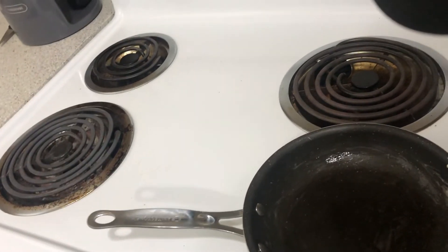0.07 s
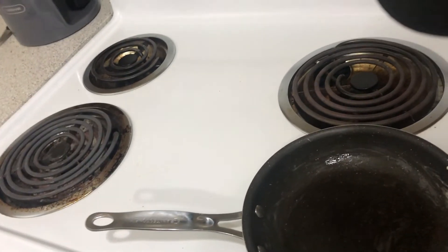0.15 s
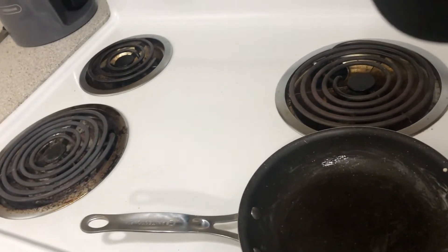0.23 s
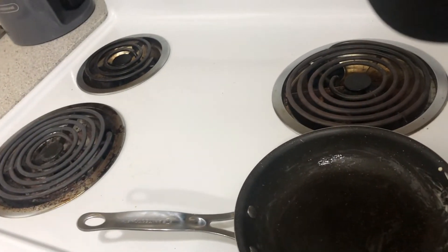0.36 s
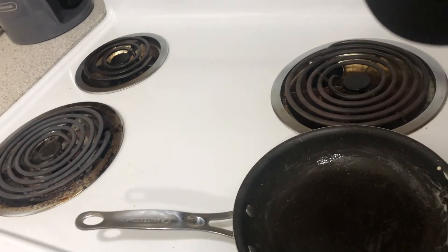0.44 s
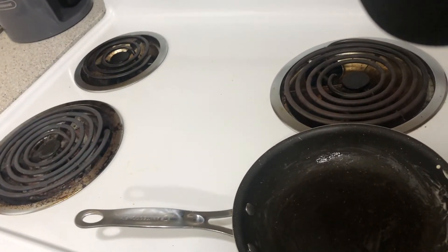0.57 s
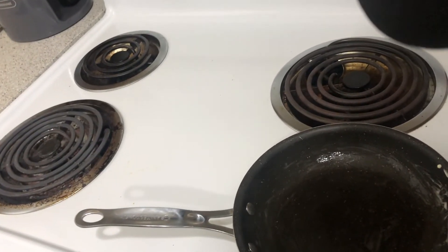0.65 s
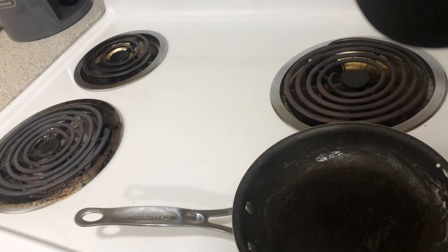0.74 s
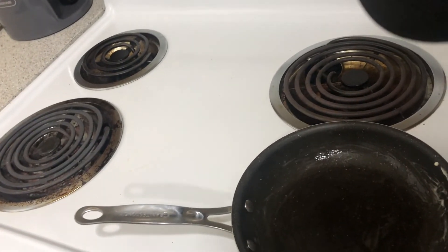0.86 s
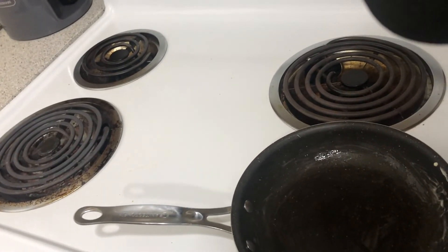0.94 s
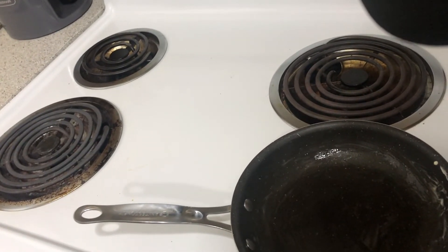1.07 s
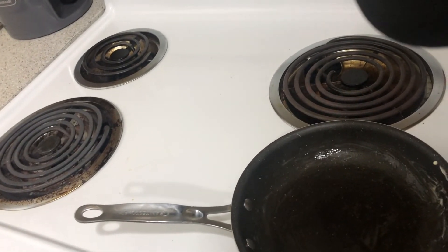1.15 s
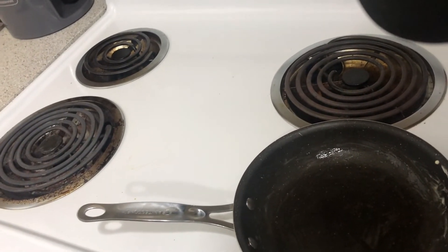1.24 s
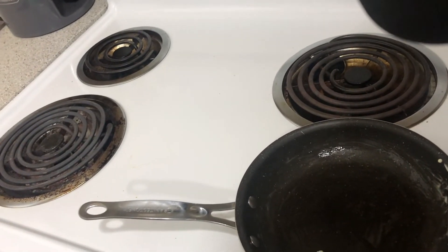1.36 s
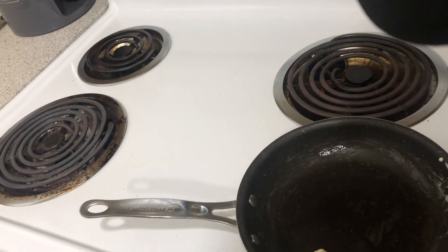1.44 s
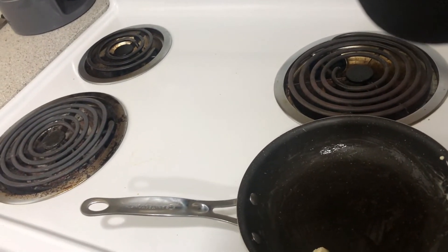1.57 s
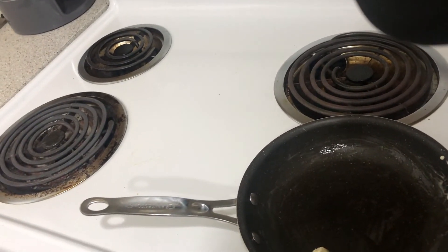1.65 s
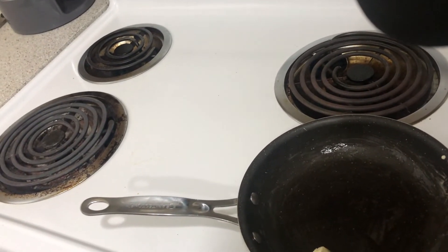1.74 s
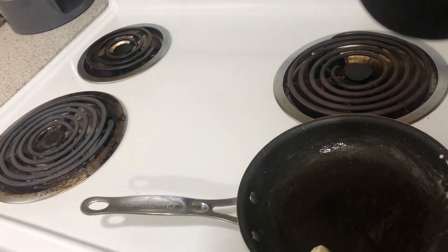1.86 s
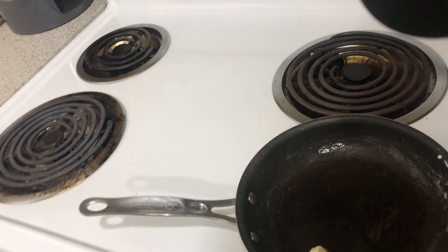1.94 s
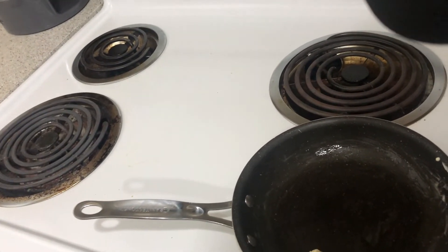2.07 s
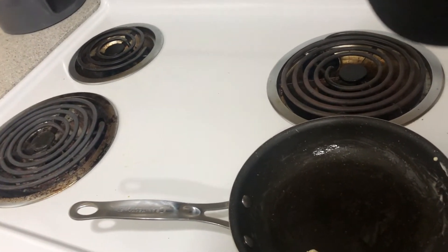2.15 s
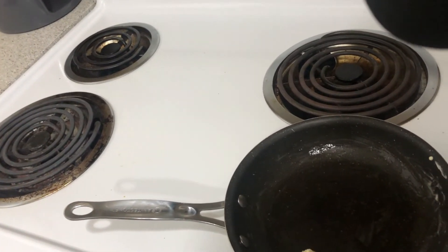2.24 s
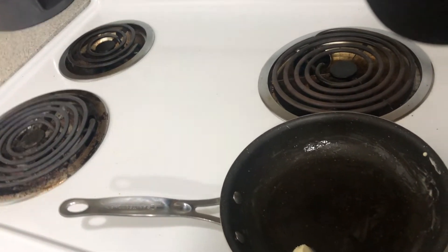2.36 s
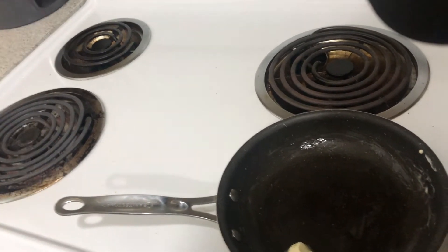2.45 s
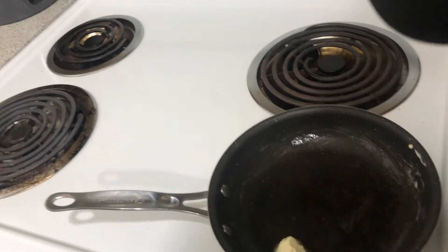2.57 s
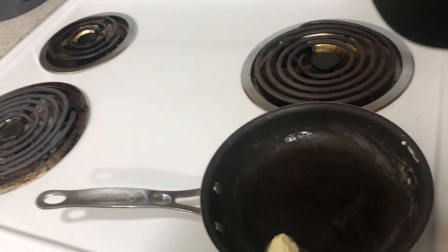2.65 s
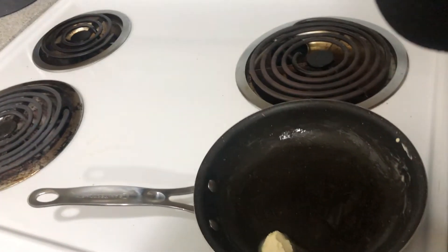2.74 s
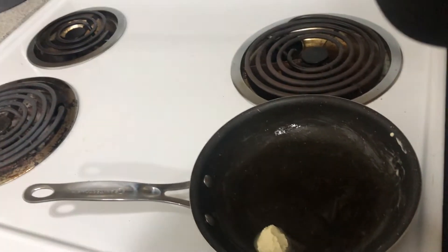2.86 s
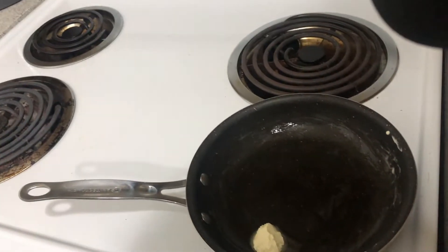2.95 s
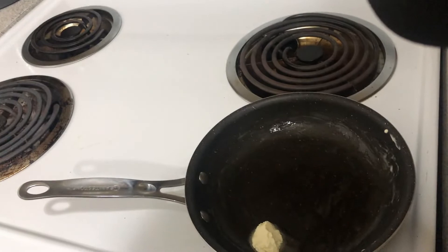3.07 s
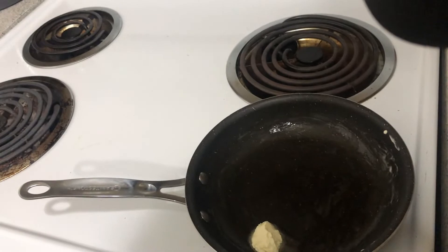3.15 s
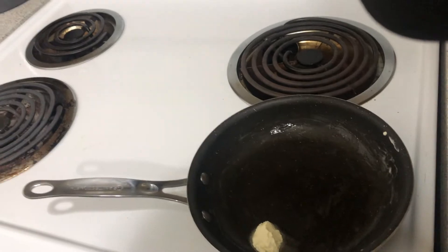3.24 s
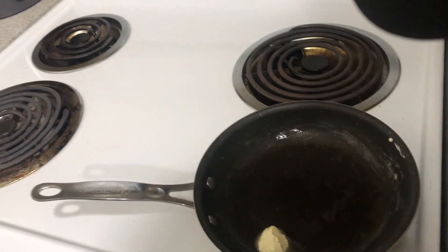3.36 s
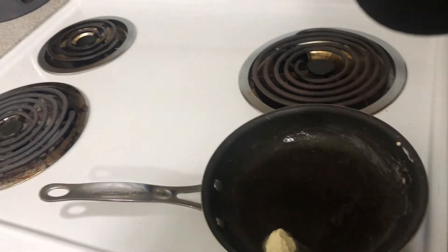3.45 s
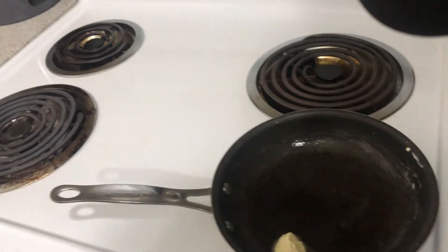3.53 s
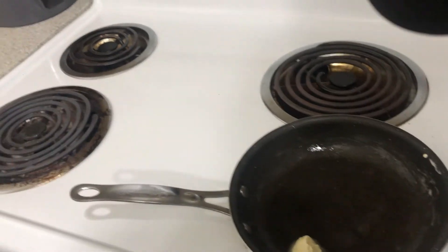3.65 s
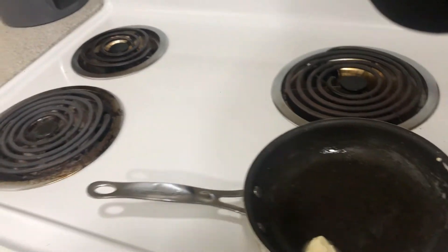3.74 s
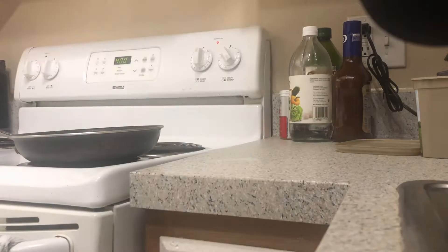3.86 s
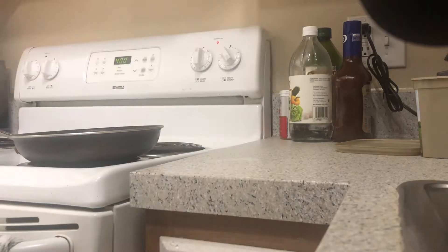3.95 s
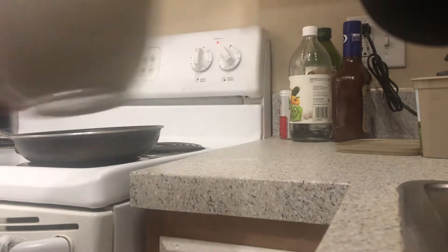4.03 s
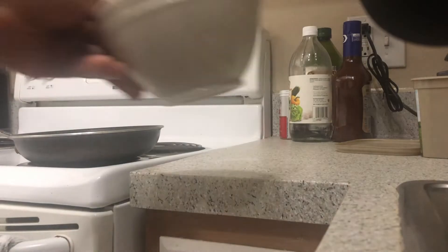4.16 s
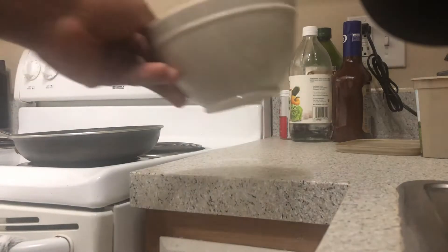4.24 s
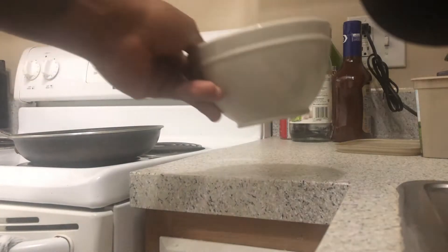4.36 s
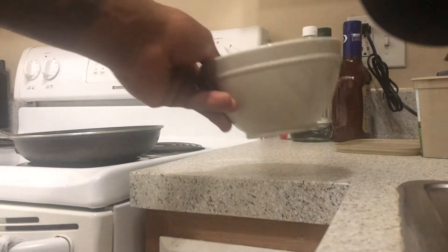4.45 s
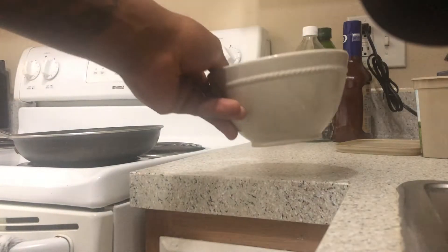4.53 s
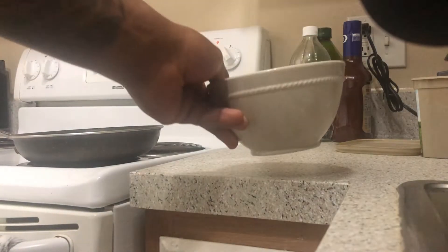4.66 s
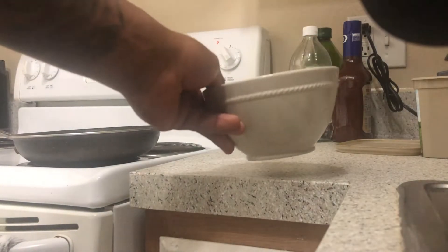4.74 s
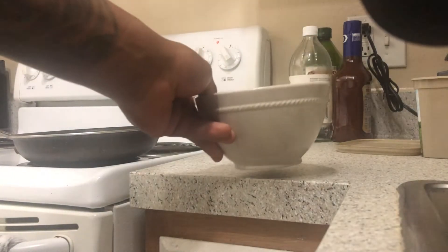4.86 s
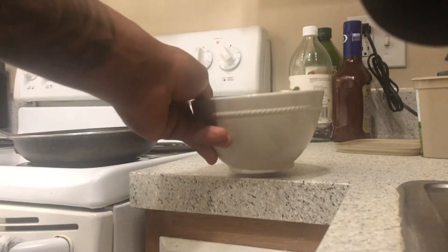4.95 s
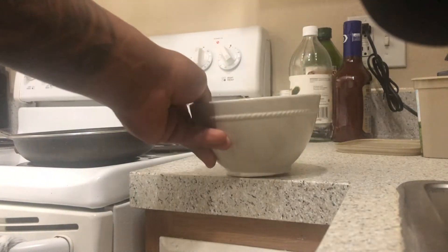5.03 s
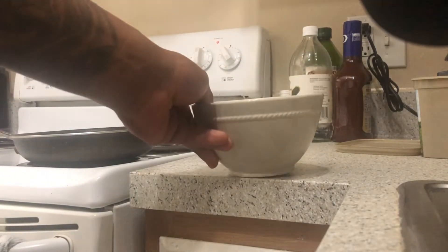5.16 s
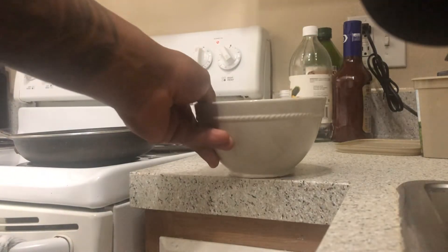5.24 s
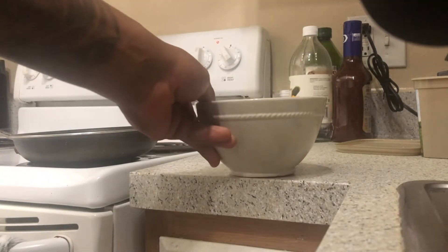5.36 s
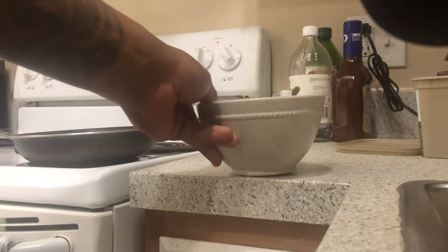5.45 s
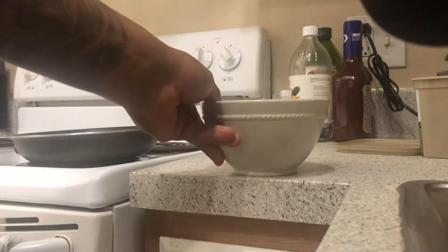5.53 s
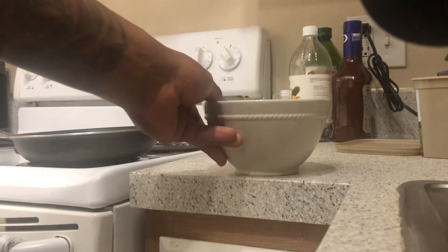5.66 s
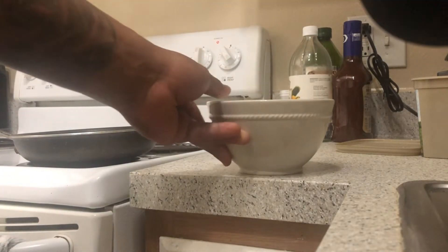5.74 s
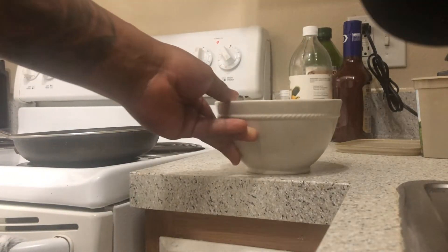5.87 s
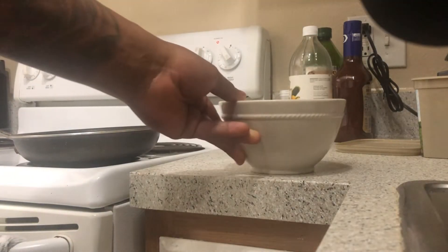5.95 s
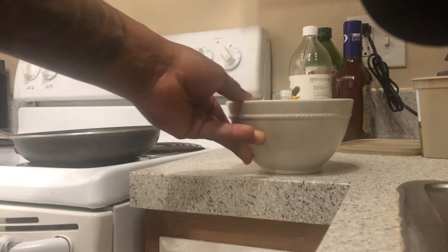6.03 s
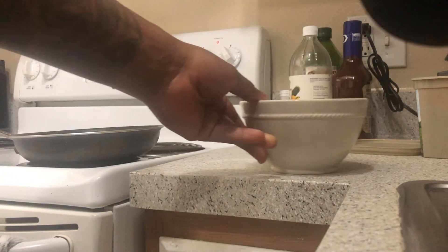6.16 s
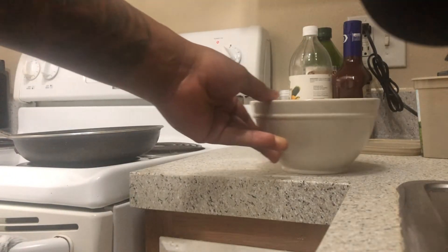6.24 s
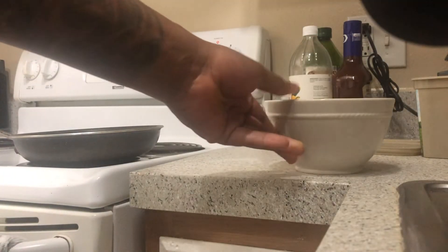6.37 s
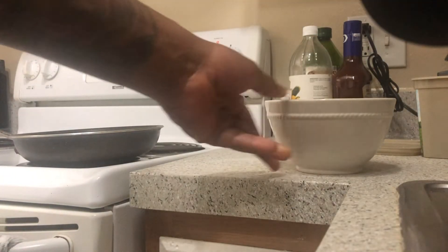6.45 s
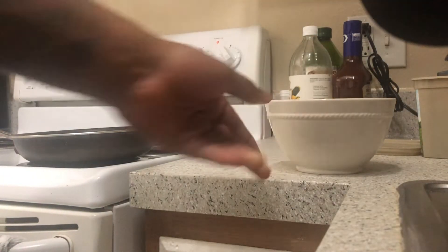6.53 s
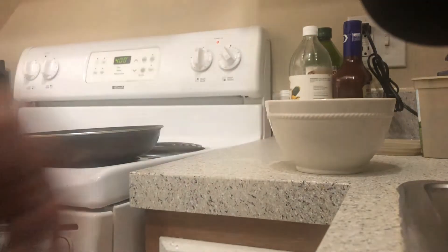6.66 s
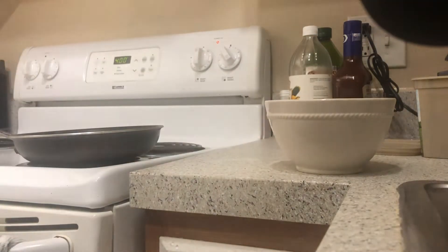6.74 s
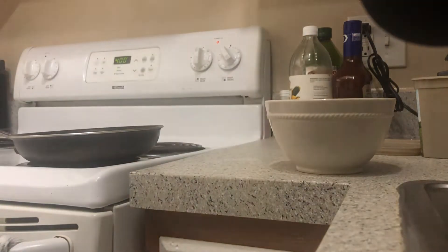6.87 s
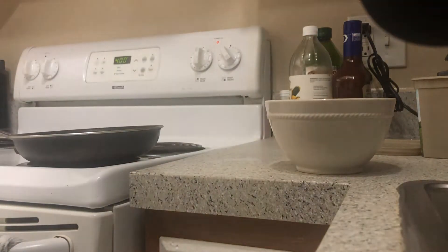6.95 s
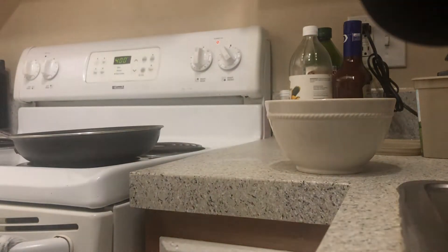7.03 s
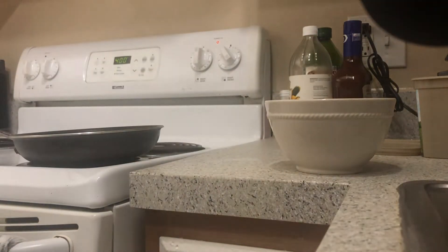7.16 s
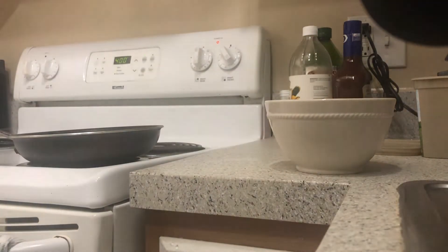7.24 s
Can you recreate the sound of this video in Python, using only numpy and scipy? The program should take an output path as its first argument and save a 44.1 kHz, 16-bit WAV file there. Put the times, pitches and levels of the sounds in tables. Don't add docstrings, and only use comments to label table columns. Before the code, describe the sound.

A quiet kitchen with low rumble and faint hiss, heard close on a phone microphone with short room reverberation. A very soft bump at 0.1 s, then near silence until a faint scrape at 1.8. A metal spoon raps a frying pan at 1.9, 2.2, 2.45, 2.7 and 2.9 s: bright ticks, a quick rebound, a short damped pan ring and a low stove-top thump, the third loudest. At 3.3 the spoon is laid down, clinking and knocking on enamel in weakening rocks until 3.55. Soft sleeve brush, palm rub and dull bumps run from 3.7 to 4.3. After a pause, a ceramic bowl touches the counter edge first at 5.1, then lands flat with a hollow clacking thud at 5.5. Gritty pushes grow into a longer scrape around 6.0-6.4, leaving a faint ring. Soft pats at 6.8-7.3.

```python
import sys
import numpy as np
from scipy import signal
from scipy.fft import rfft, irfft
from scipy.io import wavfile

SR = 44100
rng = np.random.default_rng(int(sys.argv[2]) if len(sys.argv) > 2 else 0)


def boost_factor(decibels):
    exponent = np.asarray(decibels, float) / 20
    return 10 ** exponent


def transcribe(u):
    v = np.clip(np.atleast_2d(u).T, -1, 1)
    q = np.round(v * 32767).astype(np.int16)
    wavfile.write(sys.argv[1], SR, q)


N = 321930

# (frequency [Hz], level [dB], t60 [s])
STOVE_MODES = [(84, -9, 0.14), (120.6, -3.5, 0.093), (167, -22, 0.22), (243.2, -10, 0.095),
               (339.4, -12, 0.046), (458.6, -25, 0.13), (590, -28, 0.05)]
VIEWS = [
    [1.9],
    [2.3],
    [2.7],
    [.7],
    [1.3],
    [.4],
    [2.9],
]


def at_hz(points, hz):
    table_hz, value = np.array(points).T
    return np.interp(np.log(hz), np.log(table_hz), value)


def rms_one(x):
    return x / np.sqrt(np.mean(x ** 2) + 1e-20)


def coloured(x, db_at):
    hz = np.maximum(np.fft.rfftfreq(len(x), 1 / SR), 10)
    return rms_one(irfft(rfft(x) * boost_factor(db_at(hz)), len(x)))


def grains(per_s, spread_db, size=N):
    height_db = spread_db * np.minimum(rng.exponential(1, size), 5)
    height = boost_factor(height_db) * rng.choice([-1, 1], size)
    return rms_one(height * (rng.random(size) < per_s / SR))


def ring(x, hz, t60):
    r = boost_factor(-60 / (t60 * SR))
    w = 2 * np.pi * hz / SR
    return signal.lfilter([0, np.sin(w)], [1, -2 * r * np.cos(w), r * r], x + 1e-18)


def crowd(spectrum, low_hz, t60, damping, count):
    hz = np.geomspace(low_hz, 15500, count) * rng.uniform(.97, 1.03, count)
    level_db = at_hz(spectrum, hz) + 10 * np.log10(hz / 1000)
    return np.transpose([hz, level_db, t60 * (hz / 1000) ** -damping])


def add(out, s, level_db, modes, swell_cycles):
    onset_delay_s, vary_db = .0008, 1.5
    scatter_rad = .7
    hz, mode_db, t60 = np.array(modes, float).T[:, :, None]
    t = np.arange(int(1.2 * np.clip(t60.max(), .01, .5) * SR)) / SR
    swell = (1 - np.exp(-t * hz / max(swell_cycles, .01))) ** 2
    mode_db = mode_db + vary_db * rng.standard_normal(hz.shape)
    strength = swell * boost_factor(level_db + mode_db - 60 * t / t60)
    phase = np.multiply(VIEWS, np.arange(len(hz)) ** 2) + scatter_rad * rng.standard_normal(len(hz))
    turn = 2 * np.pi * hz * t
    sound = np.cos(phase) @ (strength * np.sin(turn)) + np.sin(phase) @ (strength * np.cos(turn))
    i = round((s + onset_delay_s) * SR)
    out[:, i:i + len(t)] += sound[:, :N - i]


def stroke_db(start, swell, steady, top_db, fade_db_per_s):
    t = np.arange(N) / SR - start
    rise_db = -17 * np.clip(1 - t / max(swell, .002), 0, 1)
    fade_db = fade_db_per_s * np.maximum(t - swell - steady, 0)
    return np.where(t < 0, -200, top_db + rise_db - fade_db)


def hush():
    # (frequency [Hz], level [dB per Hz])
    hush_spectrum = [(16, -41.5), (49, -1.5), (330, -8.5), (1200, -22.5), (2670, -28), (9740, -30.5),
                     (14300, -37), (16000, -53.5)]
    return boost_factor(-65.5) * coloured(rng.standard_normal(N), lambda hz: at_hz(hush_spectrum, hz))


def kitchen(toward_walls):
    # (frequency [Hz], t60 [s])
    room_t60 = [(100, 0.69), (400, 0.52), (1200, 0.39), (3000, 0.42), (7000, 0.26), (14000, 0.23)]
    t = np.arange(SR // 2) / SR
    white = rng.standard_normal((2, len(toward_walls), len(t)))
    tail = 0
    edges_hz = 50 * 2 ** np.arange(0, 8.6, .5)
    for k, (low, high) in enumerate(zip(edges_hz, edges_hz[1:])):
        sos = signal.butter(2, [low, high], "band", fs=SR, output="sos")
        band = signal.sosfilt(sos, white[k % 2])
        tail = tail + band * boost_factor(-60 * t / at_hz(room_t60, np.sqrt(low * high)))
    tail = tail * (1 - np.exp(-t / 0.0026))
    return signal.fftconvolve(toward_walls, tail, axes=1)[:, :N].sum(axis=0) / np.sqrt(SR / 13)


def rubs():
    # (start [s], swell [s], steady [s], level [dB], centre [Hz])
    spoon_scrapes = [
        (1.769, 0.038, .115, -65.5, 2620),
        (3.459, 0.011, 0.078, -65, 2500),
    ]
    sleeve_brushes = [
        (3.68, 0.035, 0.075, -58, 7900),
        (6.77, 0.028, 0.079, -71, 7700),
    ]
    palm_rubs = [
        (3.889, 0.083, 0.042, -59, 3550),
        (4.09, 0.017, 0.051, -73.5, 3550),
    ]
    hand_pats = [
        (4.247, 0.0058, .002, -50.5, 1360),
        (6.901, 0.01, .02, -63, 3000),
        (7.23, 0.033, .05, -58, 4800),
    ]
    # (below [octaves], above [octaves], resonance [Hz], resonance [dB])
    rub_colour = [
        (10, 1, 2300, 3.5),
        (1.24, 0.53, 7400, 0.2),
        (4.2, .86, 1630, 9),
        (5, 1, 6200, 4.5),
    ]
    out = np.zeros(N)
    gestures = spoon_scrapes, sleeve_brushes, palm_rubs, hand_pats
    for rows, (below, above, peak_hz, peak_db) in zip(gestures, rub_colour):
        for s, swell, steady, level_db, centre_hz in rows:
            def hump_db(hz):
                width = np.where(hz < centre_hz, below, above)
                resonance = np.exp(-(np.log2(hz / peak_hz) / 0.22) ** 2)
                return -4.3 * (np.log2(hz / centre_hz) / width) ** 2 + peak_db * resonance

            friction = grains(per_s=9100, spread_db=1.5, size=SR // 2)
            span = slice(int(s * SR), int(s * SR) + SR // 2)
            gain = boost_factor(stroke_db(s, swell, steady, level_db, fade_db_per_s=268)[span])
            out[span] += gain * coloured(friction, hump_db)[:len(gain)]
    return out


def bumps():
    # (time [s], level [dB], frequency [Hz], t60 [s])
    soft_blows = [(0.127, -49.5, 148, 0.057), (3.891, -45.5, 157, 0.033), (4.103, -33, 239, 0.034),
                  (4.103, -56, 1930, .015), (4.117, -52, 300, 0.098), (4.254, -45.5, 300, 0.023),
                  (4.275, -44, 246, 0.034), (5.332, -44, 183, 0.073), (6.757, -60, 2300, 0.012),
                  (6.756, -57, 5300, 0.01), (6.905, -41.5, 243, 0.044), (6.909, -45, 91, 0.093),
                  (6.914, -37, 451, 0.014), (6.927, -44.5, 300, .04), (6.94, -45, 242, 0.036)]
    out = np.zeros((len(VIEWS), N))
    for s, peak_db, hz, t60 in soft_blows:
        modes = [(hz * ratio, -2 - 14 * np.log2(ratio), t60 * ratio ** -.3) for ratio in (1, 1.6, 2.3, 2.8)]
        add(out, s, peak_db, modes, swell_cycles=0.2)
    return out


def weak_pan_modes():
    # (frequency [Hz], level [dB])
    pan_envelope = [(300, -4.5), (700, -19), (1000, -9), (1350, -1.5), (2100, -11.5), (3000, -13.5),
                    (7000, -17.5), (15500, -55.5)]
    return crowd(pan_envelope, low_hz=347.1, t60=0.029, damping=0.12, count=150)


def rattle(weak):
    # (time [s], clink [dB], knock delay [s], knock [dB])
    rocks = [
        (3.265, -32.5, .003, -38.5),
        (3.372, -41, .0105, -46.5),
        (3.4218, -37, .013, -47),
        (3.471, -48.5, 0.01, -53),
        (3.53, -52, .014, -59),
    ]
    # (frequency [Hz], level [dB], t60 [s])
    spoon_modes = [(2780, -6, 0.009), (4910, -8, 0.032), (7000, 0.5, 0.0081), (8700, -5, .008),
                   (10550, -7, 0.011), (11300, -10, 0.0096), (13100, -11, 0.0073), (14400, -23, 0.0055)]
    # (frequency [Hz], level [dB], t60 [s])
    enamel_modes = [(232, -7.5, 0.16), (280, 7.5, 0.038), (419, -9.5, 0.057), (635, 0, 0.034),
                    (796, -13, 0.032), (1060, 6.5, 0.032), (1120, -14, 0.026), (1355, -2, 0.039),
                    (1463, -1, 0.036), (1950, -24.5, 0.042)]
    chatter_s, chatter_db = .009, -8
    handle_clink_db, stove_shake_db = -3.5, -5
    handle_tilt_db = 12
    soft_tilt_db = .55
    clink_hz = 4640
    out = np.zeros((len(VIEWS), N))
    high = weak[:, 0] > 2000
    steel = np.vstack([spoon_modes, weak[high] - [0, 5.5, 0]])
    enamel = np.vstack([enamel_modes, weak[~high] - [0, 8, 0]])
    for s, clink_db, lag, knock_db in rocks:
        handle = s + lag + np.cumsum([0, *chatter_s * rng.uniform(.6, 1.8, size=2)])
        for k, at in enumerate([s, *handle]):
            db = clink_db + (k > 0) * handle_clink_db + max(k - 1, 0) * chatter_db
            tilt_db = (k > 0) * handle_tilt_db + soft_tilt_db * (rocks[0][1] - db)
            touch = steel.copy()
            touch[:, 1] -= tilt_db * np.maximum(np.log2(touch[:, 0] / clink_hz), 0)
            add(out, at, db - 6, touch, swell_cycles=0.97)
        for k, at in enumerate(handle):
            add(out, at, knock_db - 1.0 + k * chatter_db, enamel, swell_cycles=0.84)
        add(out, s + lag, knock_db + stove_shake_db, STOVE_MODES, swell_cycles=0.38)
    return out


def spoon(weak):
    # (time [s], peak [dB], tick [dB], rebound re peak [dB], stove thump [dB])
    raps = [
        (1.913, -17.5, -15.5, -5, -23.5),
        (2.233, -22.5, -16.5, -3.5, -22),
        (2.447, -15, -11, -4, -19.5),
        (2.679, -17.5, -10, 0, -21),
        (2.896, -17.5, -17, -0.5, -21.5),
    ]
    # (frequency [Hz], level [dB], t60 [s])
    tick_modes = [(4570, -2.5, 0.003), (6010, -4, 0.0023), (7760, 1, 0.0015), (10180, -9.5, 0.0014),
                  (13420, -43.5, 0.003)]
    # (frequency [Hz], level [dB], t60 [s])
    pan_modes = [(330, -21, 0.0083), (1057, 5, 0.037), (1250, 11, 0.038), (1326, 8, 0.039),
                 (1740, -23, .025), (2032, 6, .03), (2270, -2, 0.012), (2640, -42, 0.012),
                 (3900, -6, 0.0067), (4700, -30, 0.018), (5600, -27, 0.019)]
    longest_ring_s, rebound_s, thump_s = .018, 0.0049, 0.00402
    out = np.zeros((len(VIEWS), N))
    strong = [(hz, db, min(t60, longest_ring_s)) for hz, db, t60 in pan_modes]
    for s, peak_db, tick_db, rebound_db, thump_db in raps:
        add(out, s, tick_db, tick_modes, swell_cycles=0.66)
        first = s, peak_db, 16000
        rebound = s + rebound_s, peak_db + rebound_db, 4500
        for at, blow_db, top_hz in (first, rebound):
            add(out, at, blow_db - 14.0, strong, swell_cycles=1.0)
            add(out, at, blow_db - 17.0, weak[weak[:, 0] < top_hz], swell_cycles=0.85)
        add(out, s + thump_s, thump_db, STOVE_MODES, swell_cycles=0.74)
    return out


def landing():
    # (time [s], thud [dB], clack [dB], bounce gap [s])
    landings = [
        (5.074, -27, -47, .018),
        (5.5272, -17, -21, .0075),
    ]
    # (time [s], thud [dB], clack [dB])
    nudges = [
        (5.0793, -31, -42.5),
        (5.435, -57, -65),
        (5.811, -47, -64),
    ]
    # (frequency [Hz], level [dB], t60 [s])
    edge_modes = [(97.2, -9.5, 0.14), (118.3, 0.5, 0.039), (199, -12, 0.34), (269, -5, 0.66),
                  (361, -13, 0.058), (457, 2, 0.073), (531, -2, 0.055), (630, -3.5, 0.089),
                  (690, -12, 0.12), (804, -6, 0.036), (1000, -7, 0.042), (1430, -35.5, 0.044)]
    flat_modes = [(101, -20.5, 0.23), (169, -18, 0.1), (262, -27.5, 0.051), (357, -8.5, 0.08),
                  (459, -1.5, 0.1), (515.6, -1.5, 0.18), (594, 4.5, 0.076), (714, -9.5, 0.1),
                  (758, -5.5, .05), (845, -5, 0.17), (944, -2, 0.044), (1022, 3, 0.12), (1180, -17, 0.025),
                  (1318, -11, 0.028)]
    # (frequency [Hz], level [dB])
    edge_clack = [(1200, 5.5), (2160, -14.5), (4070, -17), (4670, -24), (5610, -13.5), (7410, -20.5),
                  (9780, -15), (15500, -38)]
    flat_clack = [(1200, -2), (1700, -1.5), (2430, -17), (2900, -26.5), (3850, -22), (5670, -32),
                  (10700, -41), (15500, -60)]
    panel_split, panel_db = .05, -3
    ring_cycles = 40
    brush_s, brush_db, brush_clack_db = .0065, -43, -21
    bounce_db, bounce_loss_db, bounce_clack_db, quickens = -6, -1.9, -26.5, .86
    out = np.zeros((len(VIEWS), N))
    contacts = zip(landings, (nudges, []), (edge_modes, flat_modes), (edge_clack, flat_clack))
    for (s, thud, clack, gap), extra, modes, colour in contacts:
        glaze = crowd(colour, low_hz=1211, t60=0.048, damping=0.22, count=90)
        board = []
        for hz, db, t60 in modes:
            for side in (-1, 0, 1):
                panel_hz = hz * (1 + side * panel_split * rng.uniform(.5, 1.5))
                board.append((panel_hz, db - 3.5 + abs(side) * panel_db, min(t60, ring_cycles / hz)))
        hits = [(s - brush_s, brush_db, clack + brush_clack_db), (s, thud, clack), *extra]
        for k in range(3):
            at = s + gap * np.sum(quickens ** np.arange(k + 1))
            db = thud + bounce_db + bounce_loss_db * k
            hits.append((at, db, db + bounce_clack_db))
        for at, thud_db, clack_db in hits:
            add(out, at, thud_db, board, swell_cycles=0.42)
            add(out, at, clack_db - 13.5, glaze, swell_cycles=0.24)
    return out


def speed_db():
    # (start [s], speeding up [s], steady [s], top speed [dB], slowing [dB/s])
    pushes = [
        (5.358, 0.013, 0.14, -13.5, 408),
        (5.58, 0.029, 0.076, -13, 304),
        (5.70, 0.032, .025, -5, 250),
        (5.79, 0.04, 0.033, -6.5, 152),
        (5.94, 0.066, 0.067, -3, 200),
        (6.02, 0.09, .225, -0.5, 191),
    ]
    stumble_db, stumbles_per_s = 2.2, 50
    knots = int(N / SR * stumbles_per_s) + 2
    at_knot = np.arange(N) / SR * stumbles_per_s
    stumble = np.interp(at_knot, np.arange(knots), rng.standard_normal(knots))
    return np.max([stroke_db(*push) for push in pushes], axis=0) + stumble_db * stumble


def slide():
    # (frequency [Hz], width [Hz], level [dB])
    board_bands = [(101.3, 14, -13), (242, 59, -6), (300, 33, -6), (377, 58, -6), (463.7, 24, -1.5),
                   (552, 24, -7.5), (610, 11, -4.5), (669, 67, -7.5), (854, 96, -12), (1022, 53, -9),
                   (1410, 240, -19), (1924, 90, -23), (2290, 23, -33)]
    # (frequency [Hz], level [dB per Hz])
    grit_spectrum = [(900, -29), (1300, 1.5), (2400, -11), (4000, -14), (6100, -17), (7000, -22),
                     (10000, -28.5), (15000, -41)]
    # (frequency [Hz], level [dB], t60 [s])
    bowl_modes = [(3140, -6, .5), (6150, -11, .05), (7580, -14, .15), (10300, -2.5, .12),
                  (11900, -12.5, .1), (12200, -0.5, .12), (13200, -18, 0.088), (14480, -4.5, .1)]
    # (frequency [Hz], level [dB], t60 [s])
    free_modes = [(1276, -63, 1.5), (1556, -73, .25), (3085, -72, .45)]
    let_go_s, board_lag_s = 6.41, .04
    speed = speed_db()
    rumble = boost_factor(-39.5 + 0.95 * speed)
    grit = boost_factor(-59.5 + 1.05 * speed)
    chime = boost_factor(-71 + 1.3 * speed)
    keep = np.exp(-1 / (board_lag_s * SR))
    rumble = signal.lfilter([1 - keep], [1, -keep], rumble)
    slips = grains(per_s=900, spread_db=2)
    dust = grains(per_s=2800, spread_db=-1.0)
    board = np.zeros(N)
    for k, (hz, width, db) in enumerate(board_bands):
        board += boost_factor(db) * np.sqrt(width) * ring(slips, hz, 2.8 / width) * (-1) ** k
    board = signal.sosfilt(signal.butter(2, 80, "high", fs=SR, output="sos"), board)
    hiss = grit * coloured(dust, lambda hz: at_hz(grit_spectrum, hz))
    wall, foot = boost_factor(-3.5) * grit * dust, chime * dust
    bowl = np.zeros(N)
    for hz, db, t60 in bowl_modes:
        drive = wall if hz < 7000 else foot
        bowl += boost_factor(db - 7.5) * ring(drive, hz, t60) / np.sqrt(t60 * SR / 28)
    free = np.zeros((len(VIEWS), N))
    add(free, let_go_s, 0, free_modes, swell_cycles=15)
    return rumble * rms_one(board) + hiss + bowl + free[0]


def scene():
    weak = weak_pan_modes()
    blows = spoon(weak), rattle(weak), landing(), bumps()
    near = sum(blows)[0] + slide() + rubs()
    wet_db = -11, -11, -10.5, -12
    room = kitchen(sum(boost_factor(db) * blow[1:] for db, blow in zip(wet_db, blows)))
    cut = signal.butter(2, 55, "high", fs=SR, output="sos")
    return (signal.sosfilt(cut, near + room) + hush())[None]


def top_cut(x):
    return signal.sosfilt(signal.butter(12, 16530, fs=SR, output="sos"), x)


def record(dry):
    rounded = .3 * np.tanh(dry / .3)
    no_dc = signal.sosfilt(signal.butter(1, 15, "high", fs=SR, output="sos"), rounded)
    mix = signal.sosfilt(signal.cheby2(10, 40, 16200, fs=SR, output="sos"), no_dc)
    return top_cut(mix)


dry = scene()
out = record(dry)
transcribe(out)
```